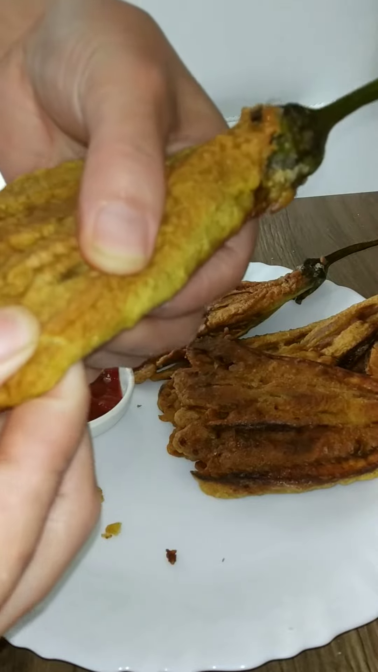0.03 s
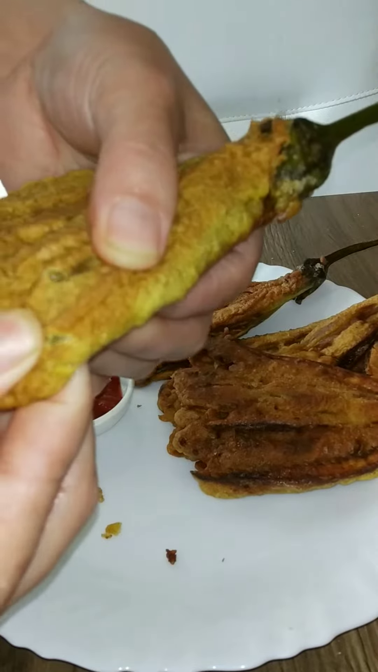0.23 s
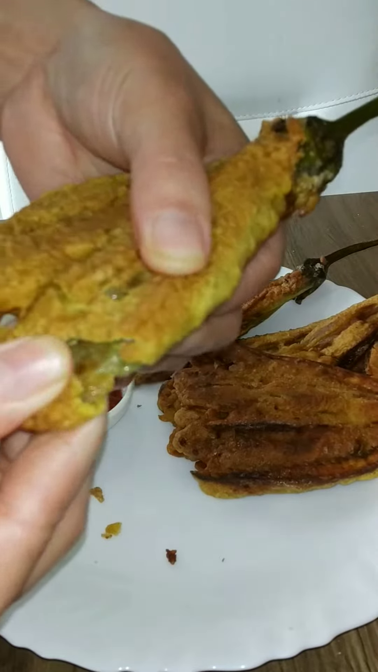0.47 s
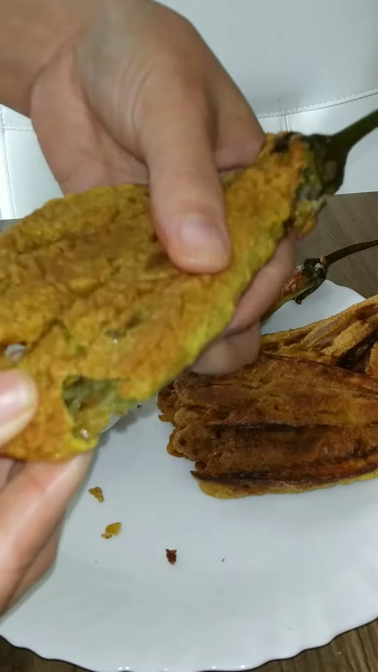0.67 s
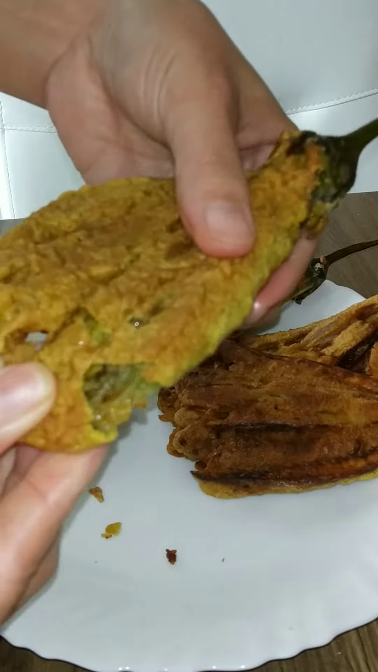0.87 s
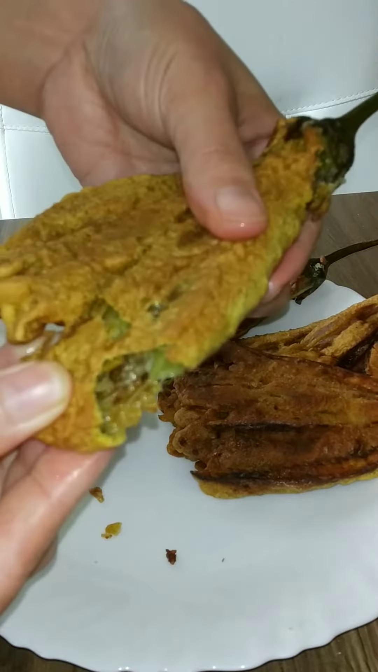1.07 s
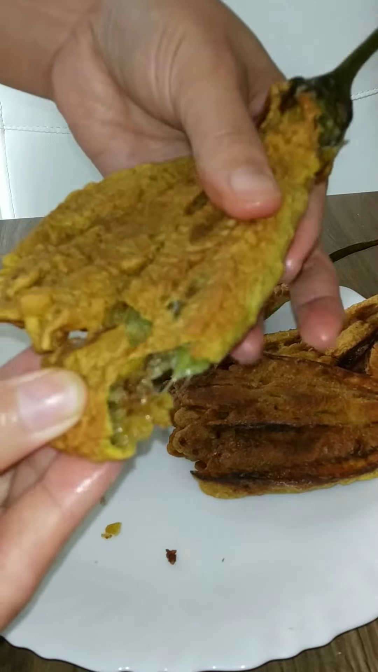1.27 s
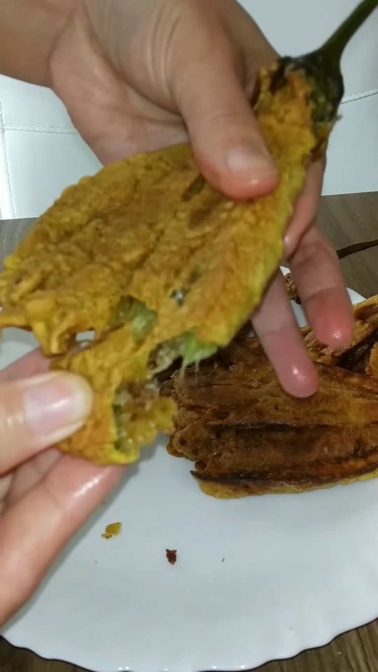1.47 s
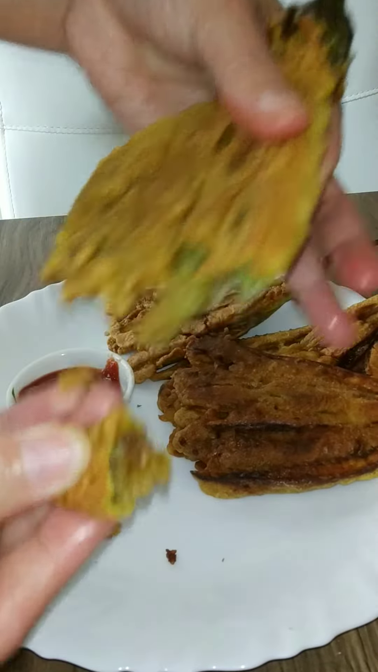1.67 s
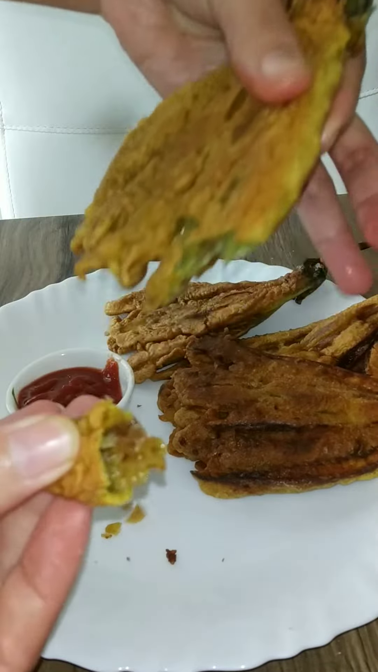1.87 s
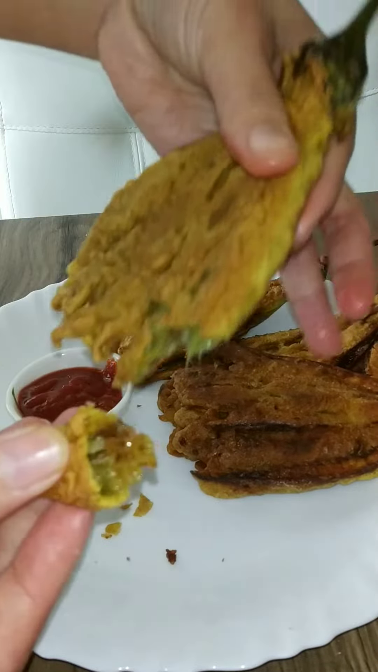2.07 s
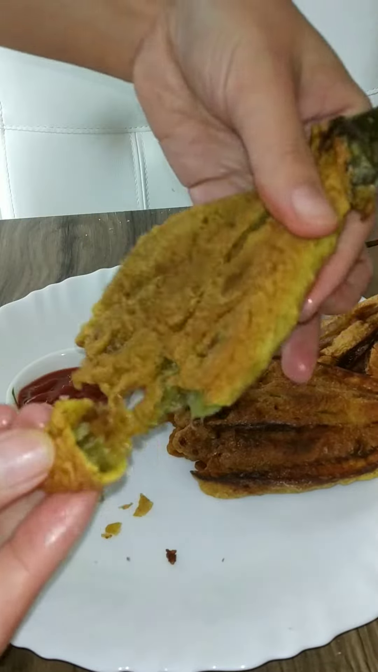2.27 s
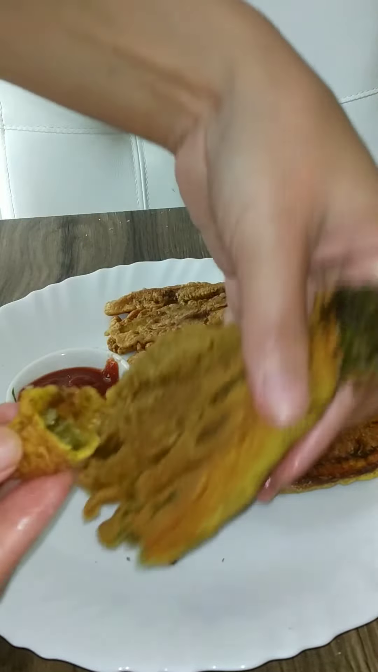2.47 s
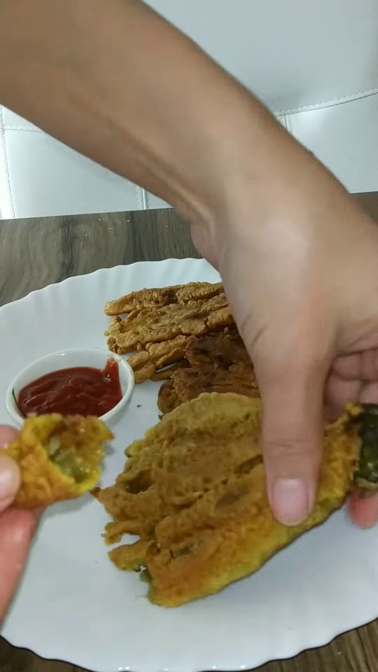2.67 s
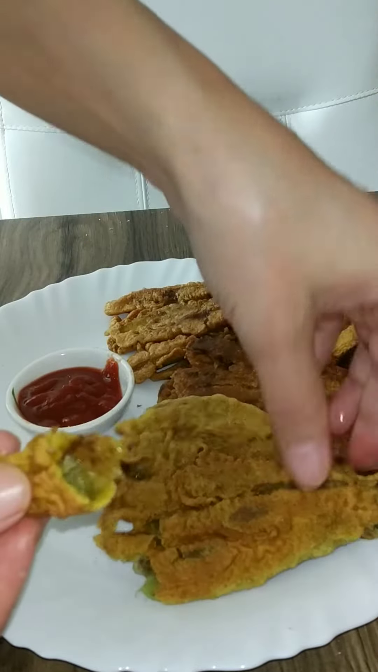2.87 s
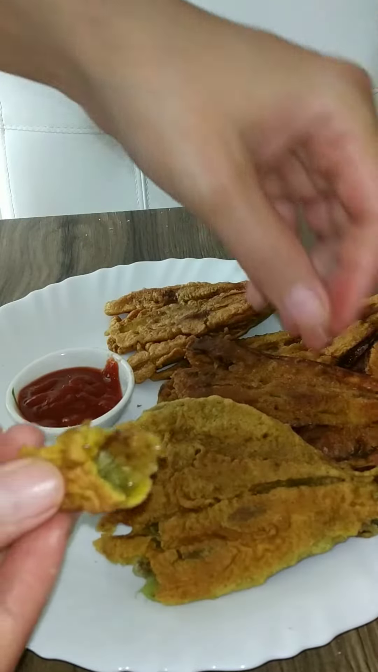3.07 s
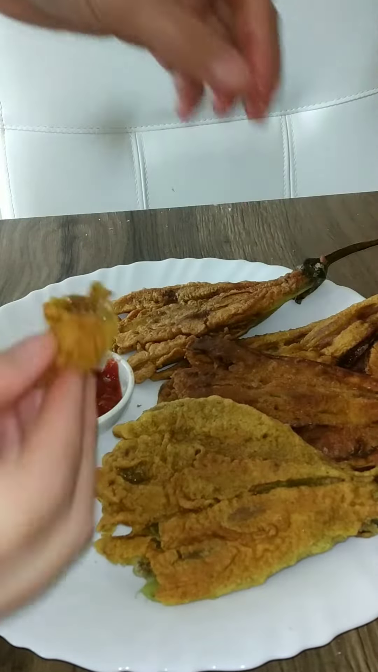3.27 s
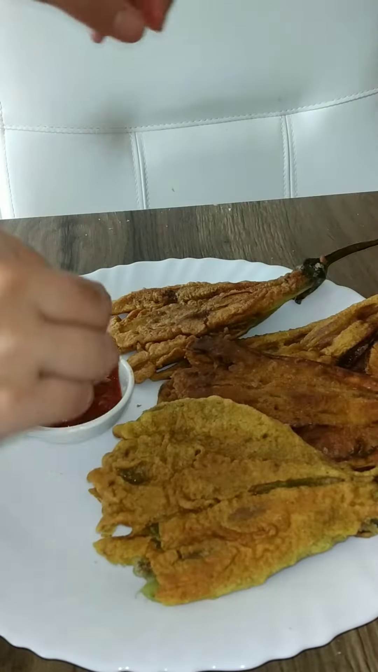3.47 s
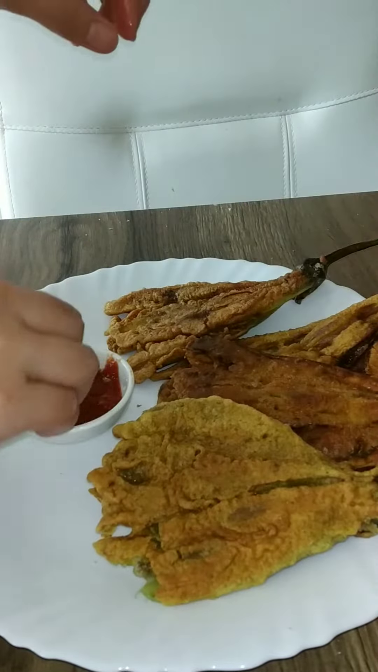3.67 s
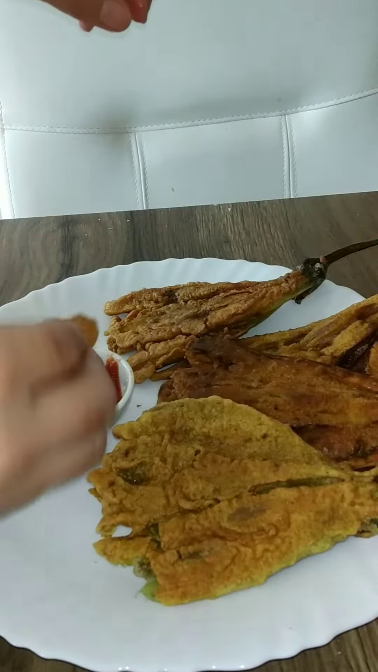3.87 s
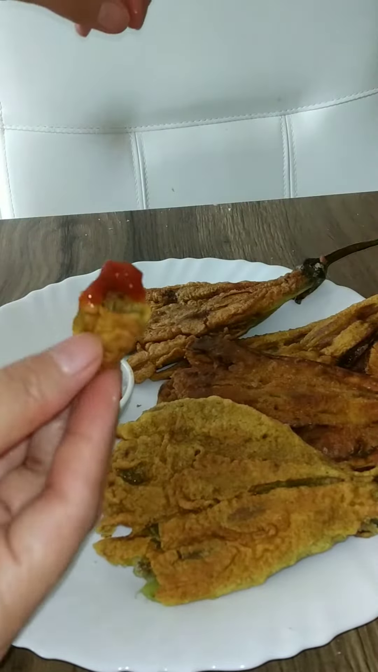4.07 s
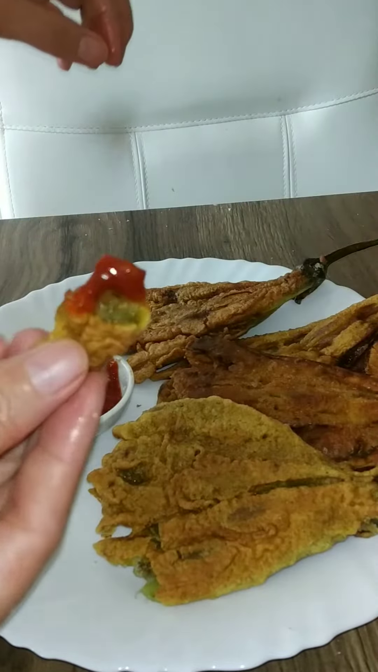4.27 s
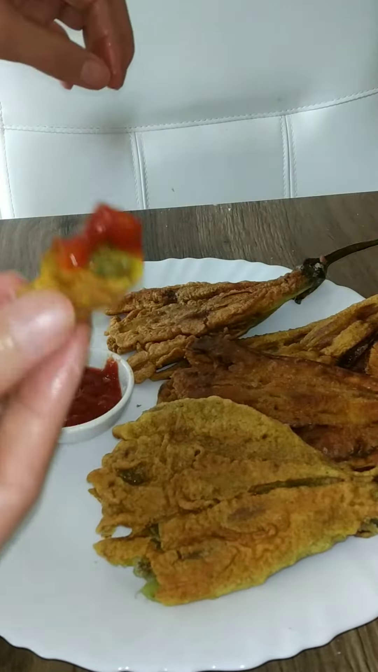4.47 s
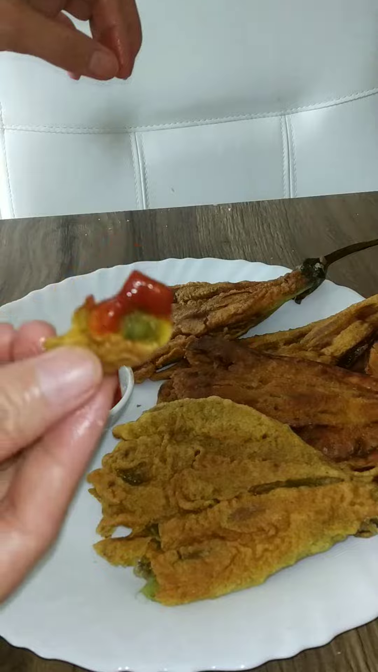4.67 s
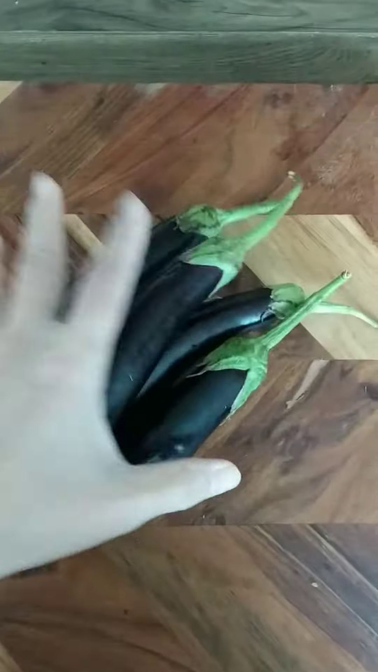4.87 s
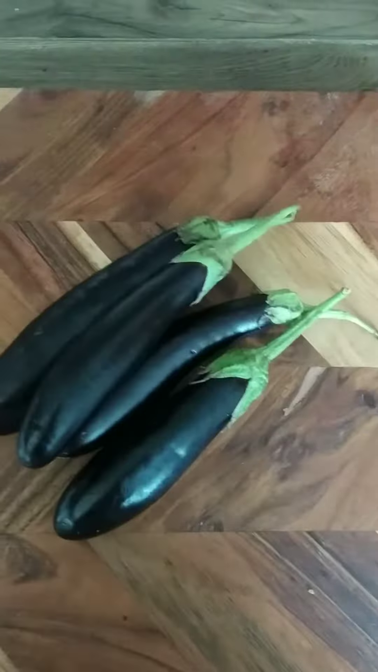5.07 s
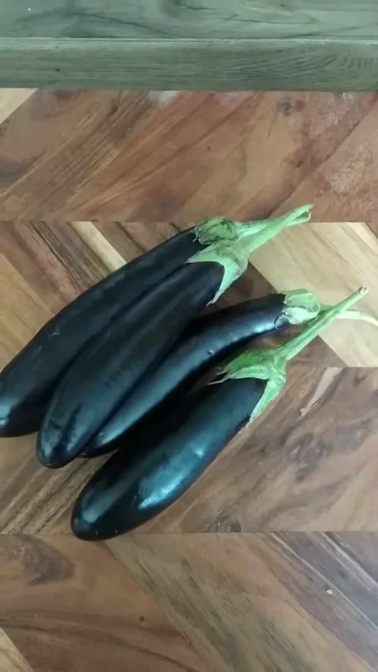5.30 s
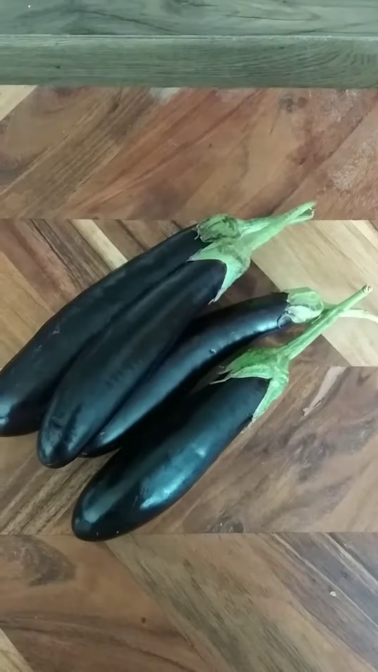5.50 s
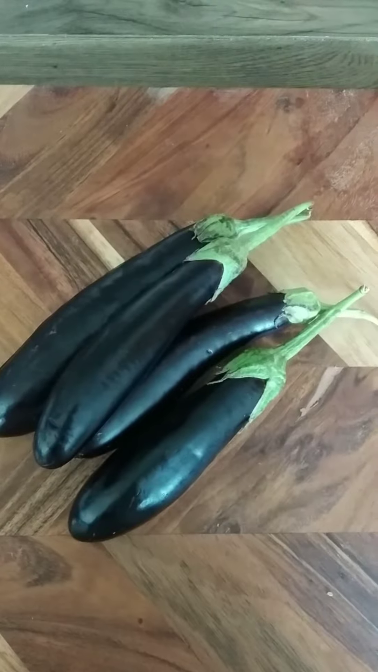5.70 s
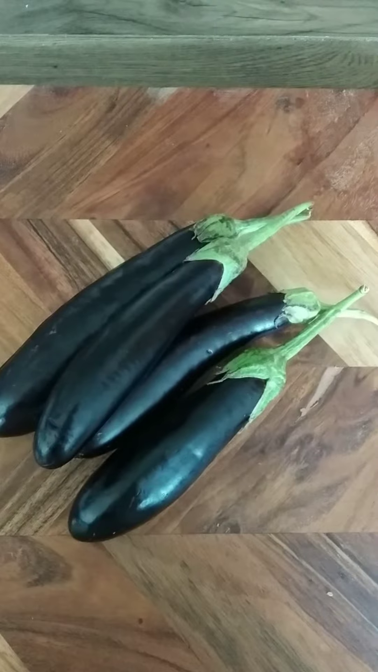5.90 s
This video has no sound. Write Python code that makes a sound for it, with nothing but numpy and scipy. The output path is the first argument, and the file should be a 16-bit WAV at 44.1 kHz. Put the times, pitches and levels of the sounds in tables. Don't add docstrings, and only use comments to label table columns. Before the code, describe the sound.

Crunchy batter crackles in short bursts, a quiet pause follows, then aubergines clatter hard onto wood with a squeaky rub, low hum throughout.

```python
import sys
import numpy as np
from scipy import signal
from scipy.fft import rfft, irfft
from scipy.io import wavfile

SR = 44100
rng = np.random.default_rng(int(sys.argv[2]) if len(sys.argv) > 2 else 0)


def ratio_of_db(decibels):
    return 10 ** (np.asarray(decibels, float) / 20)


def to_wav(s):
    ch = np.atleast_2d(s).T
    pcm = np.round(np.clip(ch, -1, 1) * 32767)
    wavfile.write(sys.argv[1], SR, pcm.astype(np.int16))


N = 261954
TIME = np.arange(N) / SR
SCENE_CHANGE_S = 4.68
LEFT_RIGHT = np.array([[1], [-1]])


def level(x, db):
    return x * ratio_of_db(db) / np.sqrt(np.mean(x ** 2))


def colour(x, points):
    hz, db = np.transpose(points)
    bins = np.maximum(np.fft.rfftfreq(N, 1 / SR), 1)
    return irfft(rfft(x) * ratio_of_db(np.interp(np.log(bins), np.log(hz), db)), N)


def ring(x, hz, width_hz):
    b, a = signal.iirpeak(hz, hz / width_hz, SR)
    return signal.lfilter(b, a, signal.lfilter(b, a, x))


def modes(force, table):
    out = 0
    for hz, db, t60 in table:
        pole = np.exp(2j * np.pi * hz / SR - np.log(1000) / (t60 * SR))
        out = out + ratio_of_db(db) * signal.lfilter([1], [1, -pole], force).imag
    return out


def grains(share, scatter_db, size):
    happens = rng.random(size) < share
    clicks = rng.standard_normal(size) * happens * ratio_of_db(scatter_db * rng.exponential(1, size))
    return clicks / np.sqrt(np.mean(clicks ** 2))


def hum(points, db, alike_hz=900, swell_db=1.0):
    mid, side = rng.standard_normal((2, N))
    side = colour(side, [(alike_hz / 12, -16), (alike_hz / 3, -13), (alike_hz, -3), (alike_hz * 2, 0)])
    swell = np.interp(TIME, np.arange(0, 7, .12), rng.standard_normal(59))
    return level(colour(np.array([mid + side, mid - side]), points), db) * ratio_of_db(swell_db * swell)


# freq_hz, density_db (per Hz)
PLATE_HUM = [(12, -59), (20, -1), (49, 2.5), (81, -12), (126, -8.5), (157, -13), (188, -3.5), (230, -16),
             (282, -11), (352, -17.5), (892, -22), (1140, -25), (1670, -40.5), (2500, -38), (3250, -47.5),
             (5500, -120)]
# freq_hz, density_db (per Hz)
BOARD_HUM = [(12, -14), (20, 4.5), (54, 9.5), (81, -3.5), (151, -9), (181, 2.5), (226, -11.5), (382, -9),
             (608, -19), (729, -23), (790, -17), (2500, -44.5), (3250, -66), (5500, -120)]


def kitchen_hum():
    second = np.clip((TIME - SCENE_CHANGE_S) / 0.013, 0, 1)
    return (1 - second) * hum(PLATE_HUM, -52.5) + second * hum(BOARD_HUM, -52)


# peak_s, level_db, swell_ms (per 10 dB), middle_db (re treble)
TEARS = [(.024, -41, 14, -9), (.249, -48.5, 1, -10.5), (.318, -41, 7, -22), (.36, -48.5, 12, -8),
         (.524, -42.5, 14, -12.5), (0.688, -53.5, 23, -4), (.935, -62, 21, -3), (.999, -46.5, 0, -21),
         (1.029, -47.5, 12, -11), (1.235, -50, 19, -12.5), (1.295, -53, 21, -17), (1.53, -62, 17.4, -7),
         (1.632, -45.5, 27, -7.5), (1.811, -53, 9, -5), (2.561, -60.5, 6, -9), (2.612, -57, 19, 3),
         (2.719, -53.5, 46, -1.5), (2.88, -62, 31, 8), (2.9, -50, 2.8, -9), (4.712, -50, 12, -13),
         (4.9, -57, 10, -4), (5.182, -63, 8, 4.5)]
# freq_hz, density_db (per Hz)
DUST_TREBLE = [(4200, -44), (7300, -0.5), (9000, -0.5), (13000, 1.5), (15500, -5), (16500, -27)]
# freq_hz, density_db (per Hz)
DUST_MIDDLE = [(700, -28), (1500, 0.5), (3000, 2.5), (5500, -0.5), (8000, -21), (10000, -43)]


def crumbling(pan_db=-0.5, level_db=-1.5, patchy_db=3):
    grip_db, grip_fall_db_per_s, grip_middle_db = -61, 4.5, -11
    fall_ms = 52
    treble = ratio_of_db(2 * (grip_db - grip_fall_db_per_s * TIME))
    middle = treble * ratio_of_db(2 * grip_middle_db)
    for peak_s, db, rise_ms, middle_db in TEARS:
        ms = (TIME - peak_s) * 1000
        drop = np.where(ms < 0, -ms / rise_ms, ms / fall_ms)
        effort = ratio_of_db(2 * (db - 10 * drop))
        treble = treble + effort
        middle = middle + effort * ratio_of_db(2 * middle_db)
    patches = np.interp(TIME, np.arange(0, 6, .004), rng.standard_normal(1500))
    dust = grains(.2, 1.3, size=(2, N))
    dust = dust * ratio_of_db(level_db + patchy_db * patches + LEFT_RIGHT * pan_db / 2)
    bright = colour(dust * np.sqrt(treble), DUST_TREBLE)
    return 1.17 * bright + 2 * colour(dust * np.sqrt(middle), DUST_MIDDLE)


# start_s, treble_db, top_db (re treble), low_db (thickness: low rings re treble)
SNAPS = [(0.0208, -26.5, 1.5, 2), (.2443, -51.5, 14, -12), (.0347, -35.5, -7, -5), (.935, -48, -1, 2.5),
         (0.2524, -50.5, 0, 8), (.2727, -45, -3, -1), (.3132, -41, -15, -25), (0.325, -33, -14, -22),
         (0.349, -39, -3, -4), (0.3541, -32, 4, 2), (0.3714, -38, -6.5, -2), (0.5119, -30.5, -12, -9),
         (0.5138, -25, -1, -23), (0.5252, -42, -2, 2), (0.5325, -39.5, -4, -3), (0.5468, -39.5, -7.5, -3.5),
         (.6819, -43, 1.5, -6), (0.6996, -40.5, -6, -4), (.993, -29, 7, -13.5), (1.0227, -29.5, 4, -7),
         (1.0251, -27, 3, -8.5), (1.0336, -34, 5, -9), (1.094, -45.5, 10, -5), (1.2296, -37.5, 8, -7),
         (1.2913, -40.5, 11.5, -21), (1.631, -41, -3, 1), (1.8078, -45, -4.5, 0), (2.6224, -47.5, -12, 8),
         (5.0363, -53, 2, 7), (2.9001, -25.5, -8, -4)]
# start_s, treble_db
FLAKES = [(.0291, -42), (.1427, -52), (0.3176, -43), (0.444, -50), (.499, -51), (.5094, -47), (0.6888, -44),
          (0.897, -55), (.1646, -49), (0.9534, -56), (1.0378, -49), (1.076, -52), (1.175, -53),
          (1.1878, -51), (1.235, -44), (1.2633, -47), (1.288, -40), (1.3436, -52), (1.4595, -57),
          (1.5196, -52), (1.5414, -49), (1.5873, -54), (1.6152, -51), (1.6251, -43), (1.6366, -45),
          (1.7619, -52), (2.5579, -47.5), (2.6021, -47.5), (2.6103, -48.5), (2.8316, -47)]
# pitch_hz, width_hz, level_db
SHELL = [(1233, 650, -2.5), (2230, 1440, 0.5), (3540, 530, -5.5), (5500, 1960, 0.4), (8120, 770, -3),
         (10370, 3800, 3), (12430, 3400, 2.5), (14200, 1200, -2.5)]


def snaps(snap_ms=0.58, tail_ms=3.7, tail_db=-16, lag=8, gain_db=-9.65, shared=0.56):
    flakes = [(s, db, 2.5, -3) for s, db in FLAKES]
    s, db, top_db, low_db = np.transpose(SNAPS + flakes)
    body_db = low_db - 0.5
    pan_db = -3.5 + 2.5 * rng.standard_normal(len(s))

    age = np.arange(900) / SR * 1000
    volley = np.exp(-age / snap_ms) + ratio_of_db(tail_db) * np.exp(-age / tail_ms)
    volley *= np.minimum(age / 0.12 + 0.2, 1)
    cracks = grains(.5, 0.95, size=(len(s), 3, len(age))) * volley
    heard = cracks[:, :2] + shared * cracks[:, 2:]

    tint_db = np.repeat([body_db, low_db, 0 * db, top_db], 2, axis=0)
    tint_db = tint_db + rng.standard_normal(tint_db.shape)
    sound = 0
    for (hz, width_hz, ring_db), tint in zip(SHELL, tint_db):
        part = ring(heard, hz, width_hz)
        part = part / np.sqrt(np.mean(part[..., :100] ** 2, axis=2, keepdims=True))
        part_db = db + gain_db + ring_db + tint + LEFT_RIGHT * pan_db / 2
        sound = sound + part * ratio_of_db(part_db).T[..., None]

    out = np.zeros((2, N))
    for start, event in zip((s * SR).astype(int) - 22, sound):
        out[0, start + lag:start + lag + len(age)] += event[0]
        out[1, start:start + len(age)] += event[1]
    return out


def room(x, t60_s=0.36, room_db=-14):
    age = np.arange(SR) / SR
    tail = rng.standard_normal((2, SR)) * np.minimum(age / 0.0018, 1)
    tail = signal.lfilter(*signal.butter(2, 450, "high", fs=SR), tail)
    dull = signal.lfilter([.2], [1, -.8], tail)
    slow = np.exp(-np.log(1000) * age / t60_s)
    quick = np.exp(-np.log(1000) * age / (.5 * t60_s))
    tail = dull * slow + 0.68 * tail * quick
    tail = tail / np.sqrt(np.mean(np.sum(tail ** 2, axis=1)))
    return ratio_of_db(room_db) * signal.fftconvolve(x.mean(axis=0)[None], tail, axes=1)[:, :N]


# pitch_hz, level_db, t60_s
CHINA = [(1950, -12, .03), (2907, -18, .17), (4210, -19, .08), (5297, -12, .09), (6045, -20, .13),
         (6691, -18, .07), (7327, -13, .12), (7750, -18, .08), (8193, -14, .11), (8409, -20, .18),
         (9012, -14, .1), (9889, -13, .12), (10960, -12, .11), (11400, -19, .1), (12000, -16, .11),
         (13290, -9, .07), (14670, -11, .06), (15390, -18, .08)]
# start_s, level_db, skid_ms, tilt_db (per octave), favoured_hz (mode of this spot)
PINGS = [
    (1.7597, -64, 4.0, 4, 11400),
    (1.8067, -54.5, 7.0, 4.5, 4210),
    (1.822, -62, 9.0, 4.0, 4210),
    (2.833, -64.5, 3.0, 2, 13290),
    (2.896, -44.5, 4.8, 3.5, 5297),
    (2.8986, -45.5, 4.7, 3, 2907),
]


def plate(pan_db=-2.5, split=0.014, twin_db=-2.0, spot_db=2.0, sustain=1.18, favoured_db=9):
    out = np.zeros((2, N))
    age = np.arange(600) / SR * 1000
    for s, db, skid_ms, tilt_db, favoured_hz in PINGS:
        force = np.zeros((2, SR // 2))
        force[:, :600] = grains(.03, 2, size=(2, 600)) * np.exp(-age / skid_ms)
        force[:, 0] = 8
        force *= ratio_of_db(db) * 4 / np.sqrt(np.sum(force ** 2, axis=1, keepdims=True))
        pairs = []
        for hz, mode_db, t60 in CHINA:
            mode_db += tilt_db * np.log2(hz / 10000)
            mode_db += favoured_db * (abs(hz / favoured_hz - 1) < 1 / 20)
            for twin in (0, 1):
                twin_level_db = mode_db + twin * twin_db + spot_db * rng.standard_normal()
                pairs.append((hz * (1 + split * twin), twin_level_db, sustain * t60 / (1 + twin)))
        i = int(s * SR)
        out[:, i:i + SR // 2] += modes(force, pairs)
    return out * ratio_of_db(LEFT_RIGHT * pan_db / 2)


# start_s, level_db, push (near -1 landing, near 1 rebound), pitch_hz (ring of fruit or dish)
BLOWS = [(2.916, -46.5, -1.06, 141), (2.948, -44, -1.1, 420), (2.9745, -48, 0.93, 420),
         (2.9829, -37, -0.91, 420), (2.9853, -41, -1, 560), (4.729, -49, -1.1, 500), (4.7497, -21, -1, 500),
         (4.7539, -5.5, -1, 900), (4.7608, -18, -1, 1000), (4.7614, -11, 1, 1150), (4.7745, -28, 1, 400),
         (4.7788, -23, -0.77, 850), (4.7856, -34, 0.92, 600), (4.7946, -24.5, -0.9, 302),
         (4.7958, -17, -1.15, 1166), (4.8029, -20, -1.1, 504), (4.8204, -21.5, -0.96, 606),
         (4.8244, -25.5, 0.91, 1180), (4.8308, -31, 0.82, 456), (4.8374, -33, -1, 900),
         (4.851, -26.5, -0.86, 680), (4.873, -37, 0.94, 454), (4.8883, -41, -1.05, 544),
         (4.8962, -37.5, 0.83, 1310), (4.912, -40, -0.65, 587), (5.1825, -35, -1, 1430),
         (5.1841, -32.5, 1, 860), (5.1883, -39, -1.14, 283), (5.2034, -41, 1, 1400)]
# pitch_hz, level_db, t60_s
BOARD = [(270.1, -45, 0.3), (398, -40.5, 0.033), (461, -39, 0.054), (705, -53.5, 0.058), (840, -74, 0.0167),
         (1080, -49.5, 0.082), (1270, -55, 0.03), (1820, -45, 0.014), (2470, -62, 0.036)]
# pitch_hz, level_db, t60_s
TABLE = [(36, -39, 0.33), (73.7, -33, 0.11), (140, -51, 0.47), (185, -56, 0.03)]


def board(thud_db=-0.5, dish_thud_db=-4, fruit_db=-27):
    force, thud, fruit, slap = np.zeros((4, N))
    for s, db, direction, hz in BLOWS:
        contact_ms = 0.48 * (1000 / hz) ** 0.77 * ratio_of_db(-0.063 * db)
        push = direction * ratio_of_db(db) * np.hanning(max(int(contact_ms * SR / 1000), 12) + 2)
        cushion_db = dish_thud_db * (s < SCENE_CHANGE_S)
        fruit_t60_s = 0.012 * ratio_of_db(-0.2 * db)
        padded = np.r_[push, np.zeros(4000 - len(push))]
        i = int(s * SR)
        force[i:i + len(push)] += push
        thud[i:i + len(push)] -= ratio_of_db(thud_db + cushion_db) * push
        fruit[i:i + 4000] += modes(padded, [(hz, fruit_db, fruit_t60_s)])
        slap[i] += ratio_of_db(db) / contact_ms ** 2
    slap = signal.lfilter([1], [1, -np.exp(-1 / (0.0015 * SR))], slap)
    return force + fruit + modes(force, BOARD) + modes(thud, TABLE) + skins(slap)


# start_s, level_db
SLIDES = [
    (4.67, -69),
    (4.742, -56),
    (4.752, -37),
    (4.762, -25.5),
    (4.776, -38),
    (4.94, -61.5),
    (4.98, -64),
]
# freq_hz, density_db (per Hz)
SKIN_COLOUR = [(150, -45), (500, -1), (1000, 3), (3000, -1.5), (6000, -12.5), (10000, -11), (16000, -15)]
# freq_hz, level_db
SLIDE_DULL = [(3000, -1.5), (12000, -3)]


def skins(slap, slap_db=-29, pan_db=2.0):
    rub = level(colour(rng.standard_normal((2, N)), SKIN_COLOUR), 0)
    s, db = np.transpose(SLIDES)
    slide = ratio_of_db(np.interp(TIME, s, db, -150, -150))
    sound = rub * ratio_of_db(slap_db) * slap + colour(rub, SLIDE_DULL) * slide
    return ratio_of_db(LEFT_RIGHT * pan_db / 2) * sound


def scene():
    close = crumbling() + snaps() + plate() + board()
    return close + room(close) + kitchen_hum()


def top_cut(x):
    return signal.sosfilt(signal.butter(12, 17150, fs=SR, output="sos"), x)


# freq_hz, density_db (per Hz)
HISS = [(500, 6.5), (2000, 2.5), (5000, 0), (14000, -1), (15500, 0.5)]
# freq_hz, level_db
ROLL_OFF = [(15600, 0), (15900, -25), (16600, -30), (16800, -80)]


def record(dry):
    left = dry[0] + ring(dry[0], 1080, width_hz=1450)
    right = dry[1] + 0.51 * ring(dry[1], 7100, width_hz=10300)
    hiss = level(colour(rng.standard_normal((2, N)), HISS), -62.5)
    return top_cut(colour(np.array([left, right]) + hiss, ROLL_OFF))


dry = scene()
out = record(dry)
to_wav(out)
```